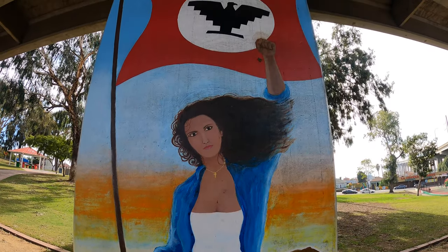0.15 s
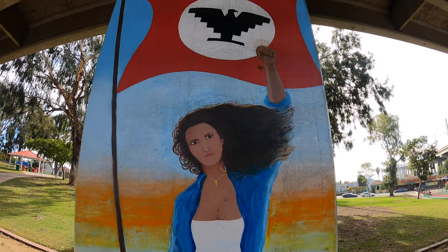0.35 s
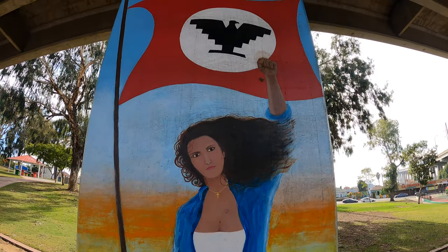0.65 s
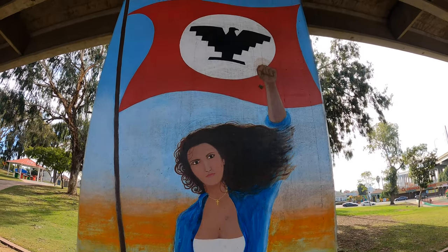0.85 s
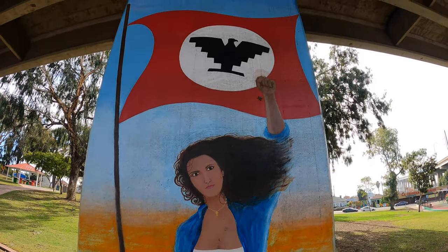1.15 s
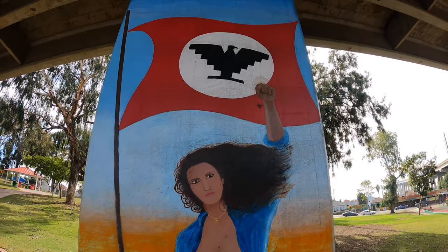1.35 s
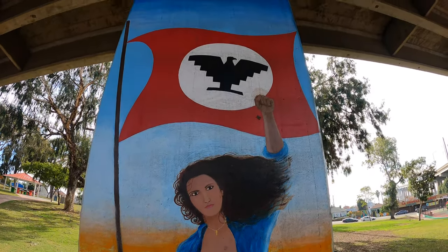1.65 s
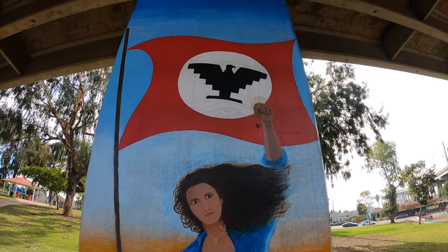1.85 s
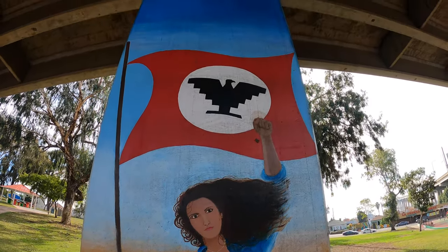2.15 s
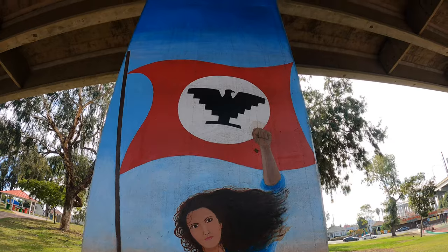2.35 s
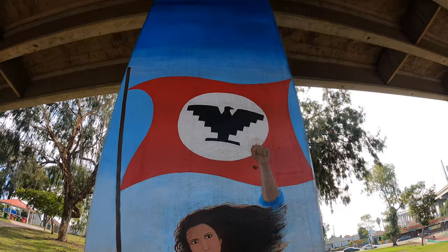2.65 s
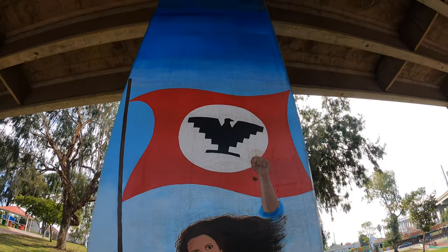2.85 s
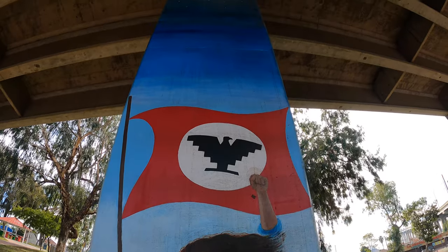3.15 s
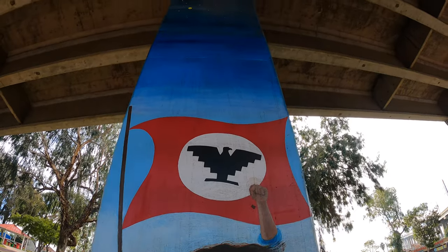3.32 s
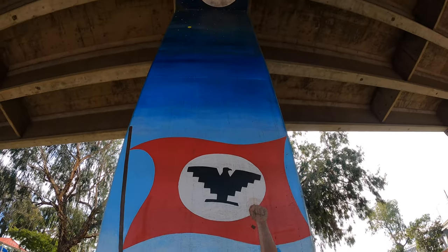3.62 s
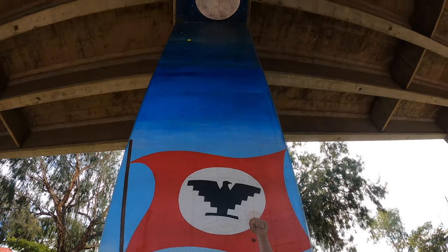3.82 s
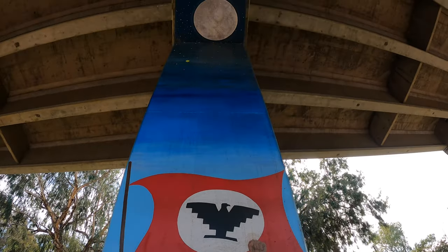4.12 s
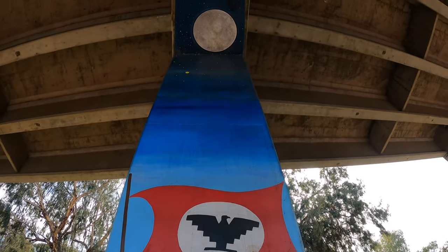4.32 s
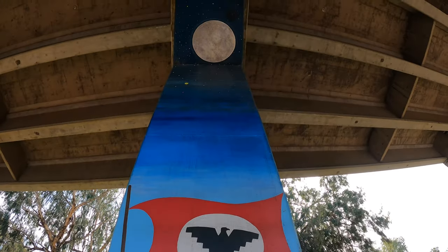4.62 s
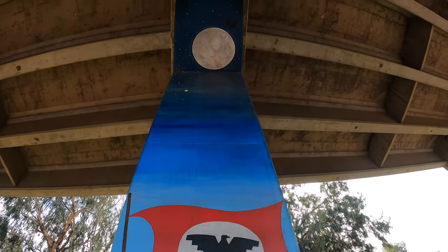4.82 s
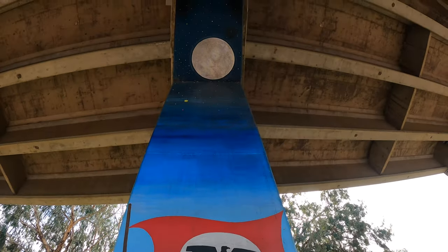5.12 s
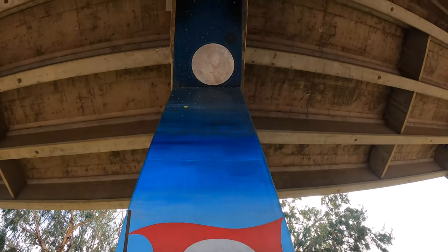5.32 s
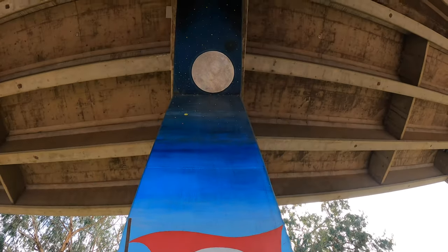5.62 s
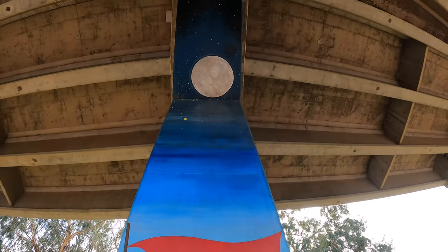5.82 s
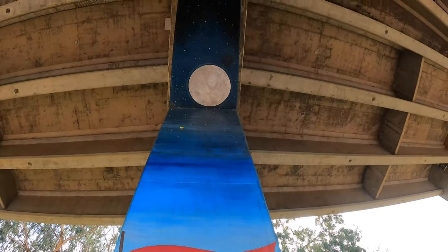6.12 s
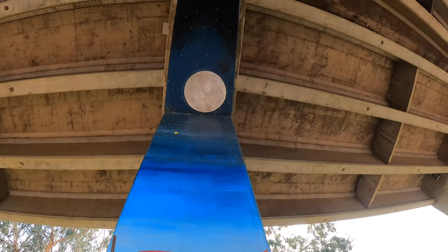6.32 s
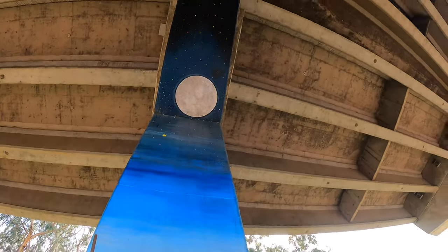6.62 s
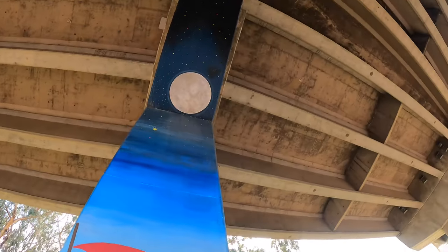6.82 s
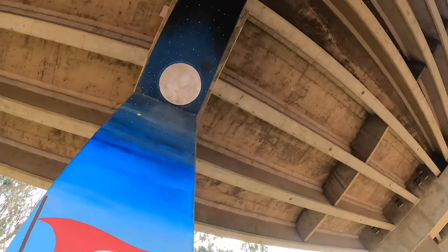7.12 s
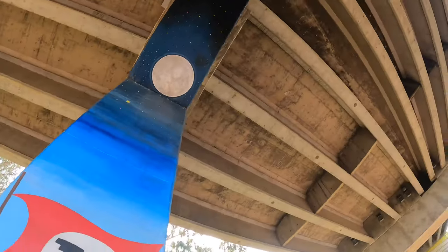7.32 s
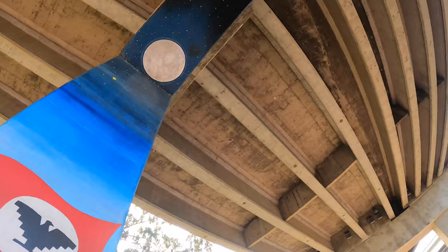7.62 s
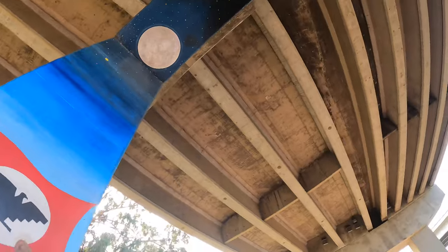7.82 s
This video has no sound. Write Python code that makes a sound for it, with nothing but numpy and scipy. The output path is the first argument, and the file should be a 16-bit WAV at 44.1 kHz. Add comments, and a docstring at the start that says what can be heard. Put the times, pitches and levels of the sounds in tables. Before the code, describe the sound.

Tyres roar and a concrete bridge rumbles overhead, with a heavy engine slowly accelerating and a faint brake squeal near the end.

```python
"""Traffic under a park bridge

Tyres roar on a concrete road bridge and the nearby streets, and the bridge deck rumbles.
A heavy vehicle slows a little, then pulls away: its engine fires faster, so the exhaust drone rises.
Near the end a far brake squeals thinly. The bass sits in the middle; the tyre roar spreads wide."""
import sys
import numpy as np
from scipy import signal
from scipy.fft import rfft, irfft, next_fast_len
from scipy.io import wavfile
from scipy.ndimage import uniform_filter1d, minimum_filter1d, map_coordinates

SR = 44100
rng = np.random.default_rng(int(sys.argv[2]) if len(sys.argv) > 2 else 0)


def transcribe(u):
    """Save the signal u as a 16-bit wav file named by the first command-line argument.

    u: samples, shape (n,) or (channels, n), limited to [-1, 1]; the rate is SR.
    q: integer samples, one column per channel.
    """
    v = np.clip(np.atleast_2d(u).T, -1, 1)
    q = np.round(v * 32767).astype(np.int16)
    wavfile.write(sys.argv[1], SR, q)


N = 351477


def traffic():
    """Many vehicles blur into four layers of noise, each drifting in level at its own pace."""
    # loudness of the layers: t/s, then level/dB of deck rumble, low roar, tyres, hiss
    levels = [(0, -28, -26, -29, -54.5), (.5, -27.5, -27.5, -31, -54.5), (1, -26.5, -28, -29.5, -52.5),
              (1.5, -27.5, -28, -30, -54.5), (2, -25.5, -27.5, -30, -55), (2.68, -27, -27, -29.5, -57),
              (3.2, -29, -28.5, -29.5, -56.5), (3.6, -29, -28.5, -30, -55.5), (4, -27.5, -29, -30.5, -55),
              (4.5, -29.5, -27.5, -30.5, -55.5), (5, -29, -27.5, -31, -56), (5.6, -25.5, -30.5, -32.5, -55),
              (6, -29, -30.5, -31, -53.5), (6.5, -28.5, -28.5, -30.5, -53.5),
              (7.2, -27.5, -28.5, -30.5, -54), (7.85, -25.5, -28, -28, -56), (7.97, -24.5, -26.5, -30, -58)]
    # tone colour of each layer: f/Hz, relative level/dB
    deck_spectrum = [(10, -42), (20, -10.5), (30, -3.5), (42, -1), (60, -5.5), (90, -1.5), (130, -30.5),
                     (200, -51), (400, -120)]
    roar_spectrum = [(30, -120), (60, -8), (100, -0.5), (150, 2), (220, -1.5), (300, -6), (420, -12),
                     (600, -22.5), (900, -67.5), (1500, -120)]
    tyre_spectrum = [(150, -120), (300, -14.5), (420, -6), (600, -5), (800, -3), (880, -3.5), (930, 0),
                     (1100, -3), (1500, -8.5), (2000, -14.5), (3000, -25), (4000, -36), (6000, -120)]
    hiss_spectrum = [(1200, -120), (2200, -3.5), (3200, -6.5), (4000, -4.5), (5000, -9.5), (6300, -15.5),
                     (7700, -20), (8100, -30.5), (9000, -49), (11000, -120)]
    deck_db, roar_db, tyre_db, hiss_db = curves(levels)
    roar_boost_db = 2.0
    deck = amp(deck_db + 0.66 * wobble(1.3)) * stereo_noise(deck_spectrum, patchy_db=0.26)
    roar = amp(roar_db + roar_boost_db + 0.67 * wobble(4.06)) * stereo_noise(roar_spectrum, patchy_db=1)
    tyres = amp(tyre_db + 0.31 * wobble(4.0)) * stereo_noise(tyre_spectrum, patchy_db=0.6)
    hiss = amp(hiss_db + 0.4 * wobble(2.5)) * stereo_noise(hiss_spectrum, patchy_db=0.9)
    return deck + roar + tyres + hiss


def exhaust_drone():
    """Tones at multiples of the engine's firing rate; echoes under the deck make each swell and waver."""
    # how often the engine fires: t/s, f/Hz
    firing_rate = [(0, 57.7), (.4, 57.57), (.9, 53.46), (1.2, 53.7), (1.7, 51.95), (2.4, 52.75),
                   (2.95, 52.8), (3.2, 53.8), (3.42, 54.55), (3.6, 55.6), (4.4, 61.26), (4.8, 63.7),
                   (5.1, 66.6), (5.42, 68.14), (5.75, 72.48), (6.05, 73.05), (6.2, 75.3), (6.4, 76.16),
                   (6.8, 79.78), (7.15, 81.85), (7.5, 82.6), (7.97, 86.9)]
    # the tones at one and two times that rate: t/s, level/dB
    first_tone = [(0, -25.5), (.15, -19.5), (.36, -21), (.5, -20.5), (.75, -29.5), (1, -22.5), (1.2, -29),
                  (1.42, -22), (1.75, -29), (2.12, -24.5), (2.35, -37), (2.9, -35.5), (3.5, -27.5),
                  (3.78, -35.5), (4, -21), (4.25, -22.5), (4.47, -34), (4.65, -21.5), (4.8, -22.5),
                  (4.92, -26), (5.05, -19.5), (5.2, -29), (5.45, -35.5), (5.68, -27.5), (5.8, -32),
                  (5.93, -23.5), (6.07, -33.5), (6.25, -23.5), (6.5, -24.5), (6.6, -29.5), (6.75, -22.5),
                  (6.95, -31.5), (7.12, -22.5), (7.25, -32.5), (7.4, -25), (7.75, -17.5), (7.97, -34.5)]
    second_tone = [(0, -45.5), (1, -42), (1.9, -30), (2.05, -31), (2.3, -29.5), (2.55, -24.5), (2.7, -25.5),
                   (2.92, -22), (3.1, -35), (3.22, -34.5), (3.38, -17.5), (3.7, -25), (3.87, -29.5),
                   (4, -24.5), (4.25, -20), (4.43, -33), (4.55, -26), (4.68, -32.5), (4.8, -19),
                   (4.92, -21), (5.02, -23.5), (5.15, -21), (5.22, -21), (5.33, -14), (5.47, -25),
                   (5.62, -20), (5.75, -23), (5.85, -20.5), (5.95, -22.5), (6.03, -19.5), (6.12, -28.5),
                   (6.25, -23), (6.42, -28.5), (6.6, -22.5), (6.8, -25), (6.95, -26.5), (7.22, -22.5),
                   (7.38, -30.5), (7.55, -21), (7.67, -27), (7.77, -20), (7.88, -28), (7.97, -26.5)]
    # the tone near three times that rate: t/s, f/Hz, level/dB
    third_tone = [(0, 172, -33.5), (.6, 168, -39.5), (1.4, 157, -46.5), (2.05, 154, -31.5),
                  (2.35, 158, -31.5), (2.52, 158, -35.5), (2.65, 158, -26.5), (2.9, 159, -26),
                  (3.15, 165, -27.5), (3.5, 166, -30), (3.9, 172, -30.5), (4.2, 178, -31),
                  (4.5, 187, -33.5), (4.8, 188, -33), (5.2, 193, -31.5), (5.5, 202, -30), (5.85, 209, -37),
                  (6.25, 217, -31.5), (6.75, 230, -35), (7.05, 239, -38), (7.55, 250, -41),
                  (7.97, 258, -41.5)]
    # swells of the higher tones, by multiple: peak t/s, half length/s, peak level/dB
    overtones = {4: [(1.7, 0.52, -34.5), (2.55, 0.14, -27.5), (2.8, 0.14, -27.5), (3.12, .08, -28),
                 (3.35, 0.1, -28), (3.65, .15, -33.5), (5.9, 0.25, -36), (7.1, .3, -40)],
                 5: [(2.2, 0.35, -33.5), (2.85, .3, -35), (4.8, 0.28, -40.5), (5.3, .25, -37),
                 (5.8, 0.3, -35), (6.25, 0.22, -33.5), (6.7, .35, -39), (7.4, .4, -42.5)],
                 5.5: [(2.72, .22, -34.5)], 7: [(1.9, 0.23, -37.5), (2.55, .25, -36), (2.85, .1, -38),
                 (3.15, 0.12, -39.5)]}
    # each tone's make-up, by multiple: steady share/dB, echo share/dB, echo wander rate/Hz
    roughness = {1: (0, -11, 12), 2: (0, -12, 14), 3: (0, -12, 18), 4: (0, -11, 20), 5: (0, -8, 28),
                 5.5: (0, -8, 28), 7: (0, -7, 30)}
    firing_hz, = curves(firing_rate)
    tones = {1: (firing_hz, *curves(first_tone)),
             2: (2 * firing_hz, *curves(second_tone)),
             3: curves(third_tone)}
    tones |= {multiple: (multiple * firing_hz, swells(rows)) for multiple, rows in overtones.items()}
    drone = np.zeros(N)
    for multiple, (hz, db) in tones.items():
        steady_db, echo_db, wander_rate = roughness[multiple]
        steady = tone(hz + multiple * 0.4 * wobble(12), db + steady_db + 1.2 * wobble(18))
        echoes = amp(db + echo_db) * smeared_tone(hz, wander_rate)[0]
        drone += steady + echoes
    return drone


def engine_hum():
    """A second, steadier engine note comes and goes three times."""
    # the note's pitch: t/s, f/Hz
    pitch = [(0, 152), (3.55, 148.9), (3.9, 143), (4.7, 148.2), (5.9, 145.1), (6.3, 140.4), (7.97, 139.1)]
    # its swells: peak t/s, half length/s, peak level/dB
    peaks = [(3.68, 0.3, -27), (4.7, 0.12, -27), (6.45, 0.58, -25.5)]
    hz, = curves(pitch)
    return tone(hz + 0.7 * wobble(10), swells(peaks) + 1.3 * wobble(7.8))


def brake_squeal():
    """A far brake's thin note, blurred by echoes, with a breathy edge and a late, duller note below."""
    # the squeal's pitch: t/s, f/Hz
    pitch = [(6.42, 8620), (7.45, 8605), (7.7, 8575), (7.97, 8500)]
    # its loudness: t/s, level/dB
    levels = [(6.3, -100), (6.47, -80), (6.62, -72), (6.8, -69), (6.97, -63), (7.1, -67), (7.22, -67),
              (7.35, -66), (7.5, -67), (7.65, -70.5), (7.85, -75), (7.95, -69)]
    hz, = curves(pitch)
    db, = curves(levels)
    core = tone(hz + 14 * wobble(30), -3 + 1.5 * wobble(25))
    echoes = amp(-3) * smeared_tone(hz - 10, rate=110)
    breath = amp(-5) * smeared_tone(hz - 80, rate=750, channels=2)
    late_fade_in = np.clip((np.arange(N) / SR - 7.55) / 0.15, 0, 1)
    lower_note = late_fade_in * amp(-76) * smeared_tone(hz - 230, rate=160, channels=2)
    return amp(db) * (core + echoes + breath) + lower_note


def high_hiss():
    """The thin top of the tyre hiss rises and falls on its own; a few faint, very high ticks cross it."""
    # loudness of the hiss: t/s, relative level/dB
    levels = [(0, -84), (1.03, -83.5), (2.2, -85), (2.8, -88), (3.19, -88), (3.4, -84), (3.6, -86),
              (3.94, -82), (4.4, -85), (4.94, -87), (5.54, -79), (6.2, -79.5), (6.7, -87), (7.97, -90)]
    # the ticks: peak t/s, half length/s, peak level/dB
    tick_peaks = [(.365, .009, -87), (.848, .009, -86), (2.365, .018, -82), (3.63, .04, -93),
                  (3.775, .015, -89), (4.665, .009, -88)]
    # tone colour of hiss and ticks: f/Hz, relative level/dB
    hiss_spectrum = [(6500, -120), (7600, -5.5), (8300, -0.5), (10300, -10.5), (10800, -19.5),
                     (11800, -12.5), (13000, -29.5), (15400, -33.5)]
    tick_spectrum = [(7000, -120), (9000, 0), (11500, 0), (13000, -6), (14000, -16), (15000, -40)]
    hiss_db, = curves(levels)
    hiss = amp(hiss_db + 2.0 + 0.6 * wobble(6)) * stereo_noise(hiss_spectrum, patchy_db=1.0)
    ticks = amp(swells(tick_peaks) + 3 * wobble(150)) * stereo_noise(tick_spectrum, patchy_db=0.5)
    return hiss + ticks


def stereo_noise(spectrum, patchy_db):
    """Noise with the given tone colour and random louder patches, centred in the bass and wide above."""
    # how alike left and right are: f/Hz, likeness (1 = the same)
    likeness = [(60, 1), (180, 1), (300, 1), (520, 0.95), (890, 0.74), (1500, 0.69), (2600, 0.64),
                (5000, 0.66), (9000, 0.7)]
    bands = signal.stft(rng.standard_normal((2, N)), nperseg=512)[2]
    patches = uniform_filter1d(rng.standard_normal(bands.shape[1:]), size=6, axis=0)  # across pitch
    patches = uniform_filter1d(patches, size=16, axis=1)  # across time
    patches /= rms(patches)
    noise = signal.istft(bands * amp(patchy_db * patches), nperseg=512)[1][:, :N]

    def colour_and_width(hz):
        angle = np.arccos(np.clip(at_frequency(likeness, hz), -1, 1)) / 2
        return amp(at_frequency(spectrum, hz)) * [np.cos(angle), np.sin(angle)]

    middle, side = filtered(noise, colour_and_width)
    return np.array([middle + side, middle - side]) / rms(middle)


def tone(hz, db):
    """A sine wave that follows a pitch curve and an rms level curve."""
    return np.sqrt(2) * amp(db) * np.sin(2 * np.pi * (np.cumsum(hz) / SR + rng.random()))


def smeared_tone(hz, rate, channels=1):
    """A blurred tone whose strength and phase wander `rate` times a second."""
    pure = np.exp(2j * np.pi * np.cumsum(hz) / SR)
    return np.real([pure * (wobble(rate) + 1j * wobble(rate)) for _ in range(channels)])


def swells(rows):
    """A level in dB that climbs to each peak and sinks away again."""
    t = np.arange(N) / SR
    drop_db = 4.5  # half a length from the peak
    humps = [peak_db - drop_db * ((t - peak_s) / half_s) ** 2 for peak_s, half_s, peak_db in rows]
    return np.max(humps, axis=0)


def wobble(rate):
    """A smooth curve through `rate` random values a second."""
    points = rng.standard_normal(int(N * rate / SR) + 4)
    return map_coordinates(points, [np.arange(N) * rate / SR])


def curves(rows):
    """Turn each column after the time into one value per sample."""
    times, *columns = np.transpose(rows)
    return [np.interp(np.arange(N) / SR, times, column) for column in columns]


def at_frequency(rows, hz):
    """Read between a table's rows on a logarithmic frequency scale."""
    row_hz, values = np.transpose(rows)
    return np.interp(np.log(hz + 1), np.log(row_hz + 1), values)


def filtered(x, response):
    """Change the strength and phase of each frequency by response(hz)."""
    size = next_fast_len(N + SR // 2)
    hz = np.fft.rfftfreq(size, 1 / SR)
    return irfft(rfft(x, size) * response(hz), size)[..., :N]


def amp(db):
    """Turn decibels into a gain."""
    return 10 ** (np.asarray(db) / 20)


def rms(x):
    """A signal's typical size (root mean square)."""
    return np.sqrt(np.mean(x ** 2) + 1e-20)


def limiter(x, ceiling):
    """Turn the sound down smoothly ahead of any peak that would pass the ceiling."""
    span = SR // 50
    needed_gain = np.minimum(1, ceiling / (np.abs(x).max(0) + 1e-9))
    held_gain = minimum_filter1d(needed_gain, size=2 * span)
    return x * uniform_filter1d(uniform_filter1d(held_gain, size=span), size=span)


def scene():
    """All the sources together, with a very short fade at each end."""
    n = np.arange(N)
    fade_s = 0.004
    fade = np.clip(np.minimum(n, N - 1 - n) / (fade_s * SR), 0, 1)
    return (traffic() + high_hiss() + exhaust_drone() + engine_hum() + brake_squeal()) * fade


def record(dry):
    """Two microphones differ in level and phase above the bass; peaks are held and the very top is cut."""
    # how much louder the left side is: f/Hz, level/dB
    left_louder = [(60, -0.3), (200, 0), (400, 0.8), (1000, 1.8), (2600, 1.7), (6000, 1), (9000, 1.5)]
    # how far the left side leads: f/Hz, phase/rad
    left_lead = [(30, -0.092), (100, 0.014), (370, 0.29), (780, 0.42), (2760, -.6), (8000, -0.68)]
    sides = np.array([[0.5], [-0.5]])  # left and right each take half

    def microphones(hz):
        gain = amp(sides * at_frequency(left_louder, hz))
        return gain * np.exp(1j * sides * at_frequency(left_lead, hz))

    limited = limiter(filtered(dry, microphones), ceiling=0.42)
    return filtered(limited, lambda hz: hz < 15400)


dry = scene()
out = record(dry)
transcribe(out)
```